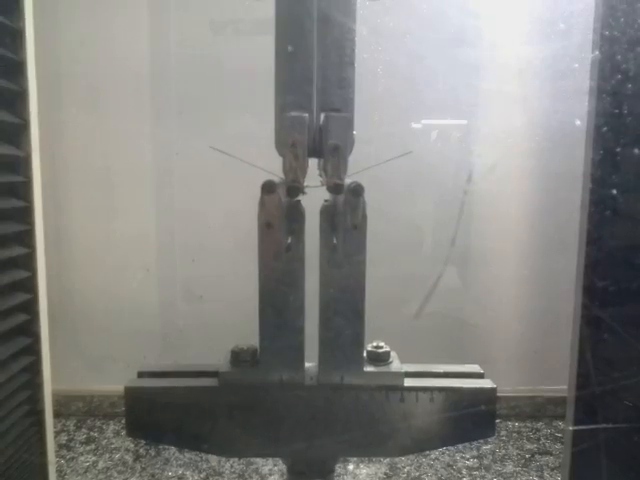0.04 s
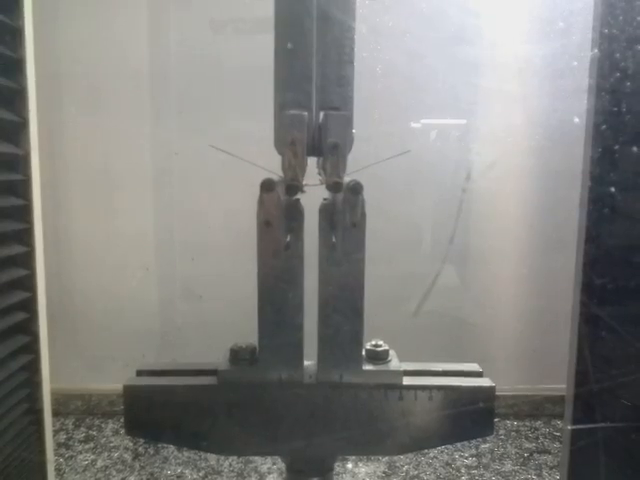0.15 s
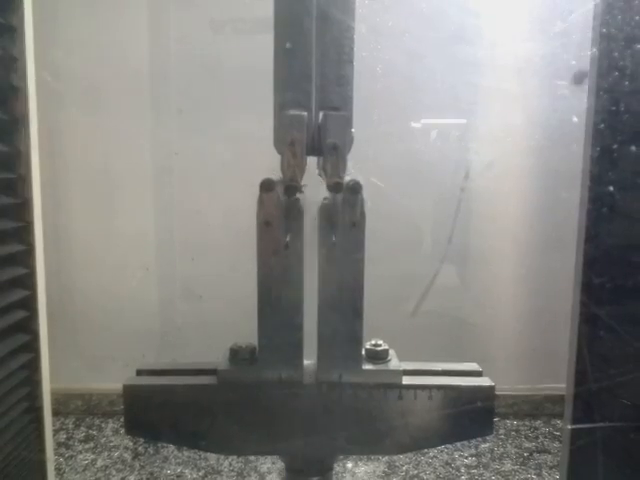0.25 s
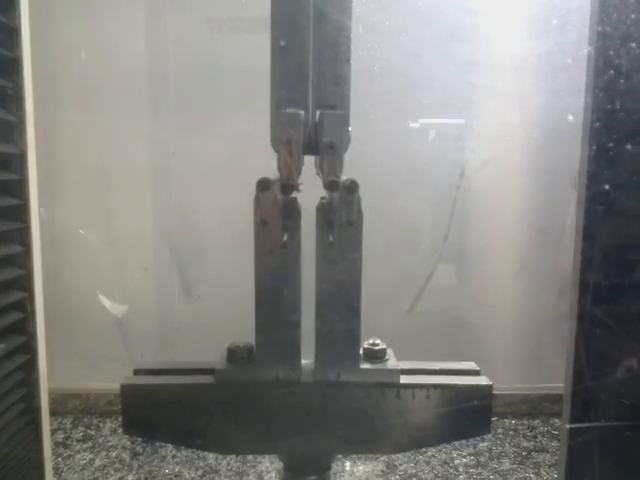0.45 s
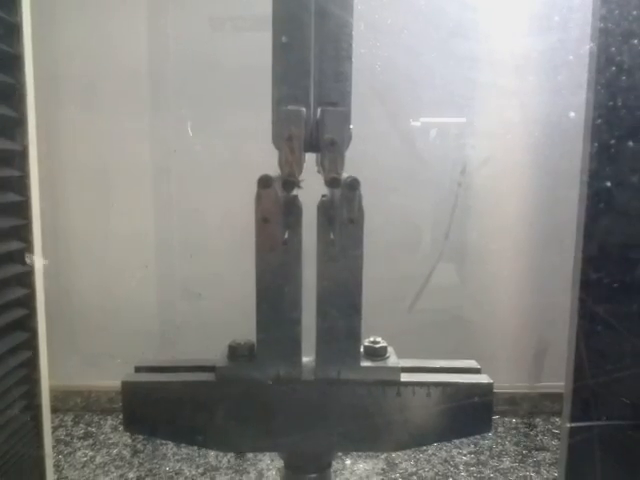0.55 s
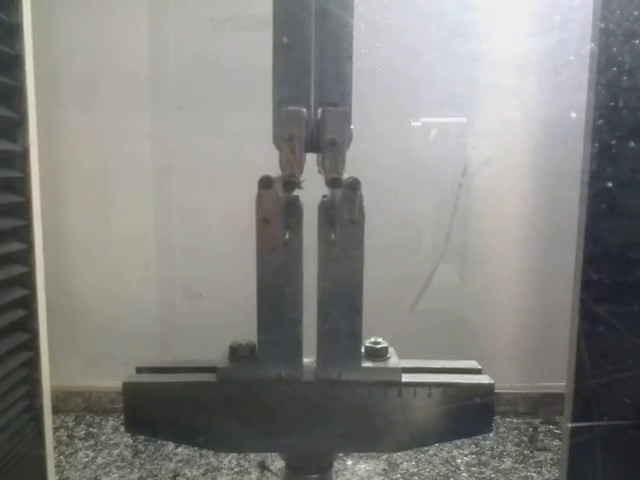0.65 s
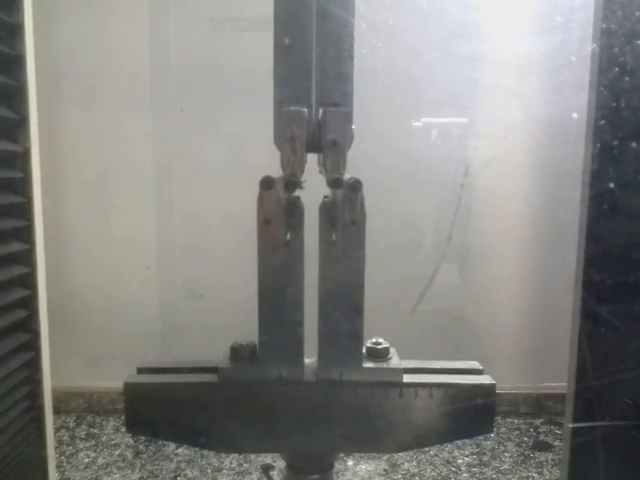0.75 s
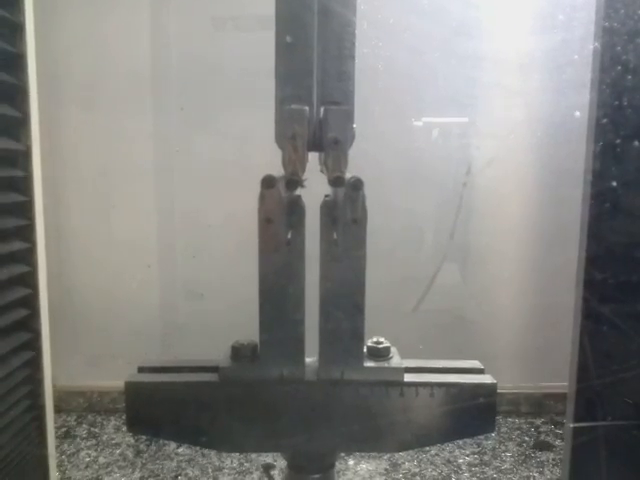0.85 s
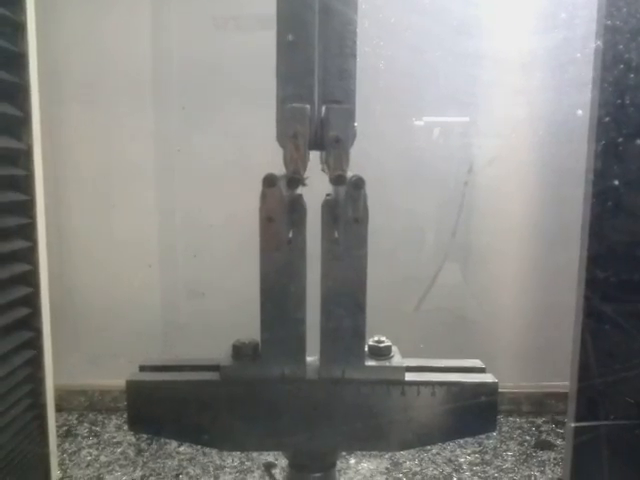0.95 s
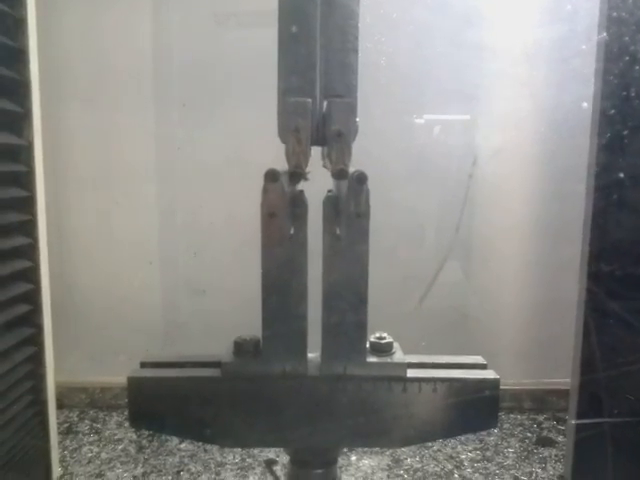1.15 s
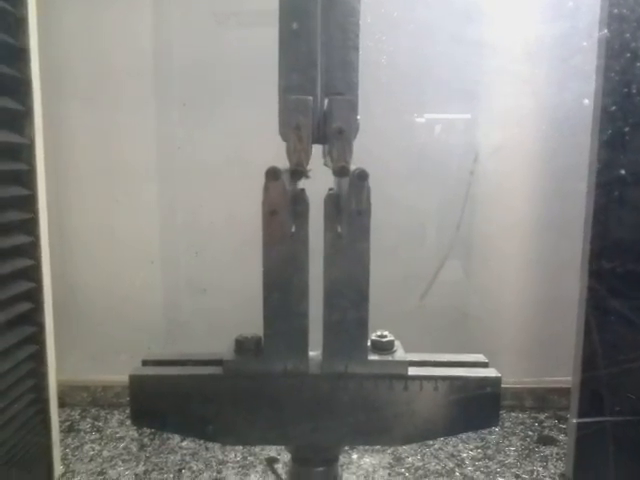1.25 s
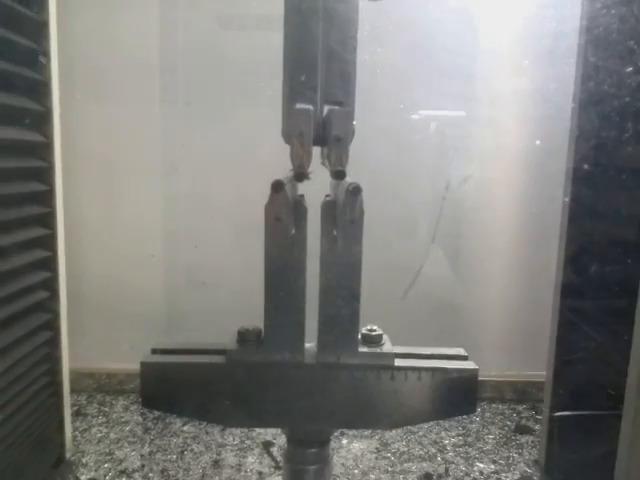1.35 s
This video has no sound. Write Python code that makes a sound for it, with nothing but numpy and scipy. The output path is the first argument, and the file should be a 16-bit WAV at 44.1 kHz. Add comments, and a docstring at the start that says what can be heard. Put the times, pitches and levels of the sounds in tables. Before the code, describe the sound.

A thin glass sheet snaps with one sharp, loud crack in a softly humming testing machine. The steel holder and hard-walled room ring as splinters spray against the guard, then a few pieces faintly tick and tinkle down.

```python
"""In a hard-walled room, a testing machine hums as it bends a thin sheet of glass.
The sheet snaps with one sharp crack that sets the machine's steel holder and the room ringing.
Splinters spray against the guard, then single pieces tick and tinkle down over the hum.
The microphone is stereo only for the high sounds, and it rounds off the loudest peaks."""
import sys
import numpy as np
from scipy import signal
from scipy.fft import rfft, irfft
from scipy.io import wavfile

SR = 44100
rng = np.random.default_rng(int(sys.argv[2]) if len(sys.argv) > 2 else 0)


def store_wav(level_fs):
    """Save 16-bit WAV to argv[1]."""
    pcm = np.round(np.clip(np.atleast_2d(level_fs), -1, 1) * 32767)
    wavfile.write(sys.argv[1], SR, pcm.T.astype(np.int16))


N = 61739
SNAP_S = .2474  # when the glass breaks


def gain(db):
    """Turn decibels into a number to multiply by."""
    return 10 ** (np.asarray(db) / 20)


def frequencies():
    """Every frequency in the sound's spectrum, in Hz."""
    return np.arange(N // 2 + 1) * SR / N


def curve(points):
    """Join (frequency, value) points with lines, giving each octave equal space."""
    hz, values = np.array(points, float).T
    return np.interp(np.log(frequencies() + 1e-9), np.log(hz), values)


def noise(points):
    """Noise shaped by (frequency, level) points, then scaled to strength 1."""
    shaped = irfft(rfft(rng.standard_normal(N)) * gain(curve(points)), N)
    return shaped / np.sqrt(np.mean(shaped ** 2))


def since(start):
    """Seconds since a moment, zero before it."""
    return np.maximum(np.arange(N) / SR - start, 0)


def fade(age, fade_s):
    """Start suddenly, then die away. A fade time is how long a 60 dB drop takes."""
    return (age > 0) * np.exp(-np.log(1000) * age / max(fade_s, 1e-4))


def ring(age, hz, fade_s):
    """One fading note of a struck object."""
    return np.sin(2 * np.pi * hz * age) * fade(age, fade_s)


# The rush of the machine and air vents (frequency [Hz], relative level [dB])
MACHINE_RUSH = [(25, -5.5), (45, -2.5), (75, -10), (110, -7.5), (140, -10.5), (290, -6), (460, -8.5),
                (600, -13.5), (900, -18), (1400, -22.5), (2300, -28.5), (3100, -28.5), (4500, -43),
                (6500, -54.5), (10000, -56), (14000, -58.5)]
# The machine's steady notes (frequency [Hz], level [dB])
MACHINE_NOTES = [(307, -63), (937, -74.5)]

def machine(whine_hz=3028, whine_from_s=.81, swell_s=.083):
    """The machine and vents make a low rush with faint notes; a thin whine joins after the break."""
    notes = sum(gain(db) * np.sin(2 * np.pi * hz * since(0)) for hz, db in MACHINE_NOTES)
    whine = noise([(whine_hz * .98, -80), (whine_hz, 0), (whine_hz * 1.02, -80)])
    swell = np.minimum(since(whine_from_s) / swell_s, 1)
    return gain(-48) * noise(MACHINE_RUSH) + np.sqrt(2) * notes + gain(-67.5) * whine * swell


# The tone of the room's echo (frequency [Hz], relative level [dB])
ECHO_TONE = [(59, -51), (100, -23.5), (175, -7), (275, -8.5), (312, 2), (346, -7), (408, -2.5), (502, -9),
             (604, -3), (670, -7), (1080, -6), (1250, -5.5), (1630, -0.5), (2370, -2), (2730, 0),
             (3430, -2.5), (3970, -1), (4680, -6.5), (6120, -20), (7690, -24), (8700, -21), (10100, -17),
             (14000, -43.5)]
# How long the echo lasts (frequency [Hz], fade time [s])
ECHO_FADES = [(150, 0.93), (400, 1.12), (1000, 1.12), (2000, 1.187), (4000, 1.04), (7000, 1.1), (13000, 1)]

def room_echo(start, build_s=.006):
    """A click bounces off the walls and blurs into noise; each pitch range fades at its own speed."""
    age, spectrum = since(start), rfft(noise(ECHO_TONE))
    echo = 0
    for hz, fade_s in ECHO_FADES:
        band = curve([(other_hz, other_hz == hz) for other_hz, _ in ECHO_FADES])
        echo += irfft(spectrum * band, N) * fade(age, fade_s)
    return echo * (1 - np.exp(-age / build_s))


# Slivers that ring as they land (time [s], frequency [Hz], level [dB], fade time [s])
SLIVER_RINGS = [(1.118, 9140, -55.5, 0.057), (1.19, 5540, -59.5, .09), (1.19, 13700, -61, .08)]
# Pieces landing (time [s], peak level [dB], middle frequency [Hz], width [octaves], fade time [s])
LANDING_TICKS = [(.651, -47, 11000, .3, 0.01), (.879, -45, 7450, 0.57, 0.049),
                 (.936, -43, 4580, 0.17, 0.023), (1.1235, -31, 1470, .6, 0.0032),
                 (1.1668, -39.5, 2800, 0.84, 0.0014), (1.1668, -48.5, 10260, 0.2, 0.02)]

def falling_pieces():
    """Thin slivers ring when they land; bigger pieces make a short tick of noise."""
    out = sum(gain(db) * ring(since(at), hz, fade_s) for at, hz, db, fade_s in SLIVER_RINGS)
    for at, db, hz, octaves, fade_s in LANDING_TICKS:
        band = np.exp(-.5 * (np.log2((frequencies() + 1) / hz) / octaves) ** 2)
        burst = rng.standard_normal(N) * fade(since(at), fade_s)
        tick = irfft(rfft(burst) * band, N)
        out += gain(db) * tick / np.abs(tick).max()
    return out


# Showers of splinters (time [s], spread in time [s], level [dB])
SPLINTER_SHOWERS = [(.322, 0.021, -28.5), (.372, 0.017, -36), (.634, 0.011, -51), (0.801, 0.017, -61.5),
                    (0.982, .01, -63), (1.07, .06, -71.5), (1.19, 0.018, -69.5)]

def splinters(count=60, middle_hz=9680, scatter_octaves=.12, scatter_db=3):
    """Splinters hit the guard in showers, each a cloud of tiny, high, short rings."""
    out, age = np.zeros(N), np.arange(SR // 20) / SR
    for at, spread, db in SPLINTER_SHOWERS:
        cloud = np.zeros(N + len(age))
        for when, pitch, size in rng.standard_normal((count, 3)):
            start = int(np.clip(at + spread * when, SNAP_S, (N - 1) / SR) * SR)
            hz = middle_hz * 2 ** (scatter_octaves * pitch)
            cloud[start:start + len(age)] += gain(scatter_db * size) * ring(age, hz, fade_s=.017)
        shower_samples = np.sqrt(2 * np.pi) * spread * SR
        strength = np.sqrt(np.sum(cloud ** 2) / shower_samples)
        out += gain(db) * cloud[:N] / strength
    return out


def loose_glass(echo_db=-7.5):
    """The splinters and falling pieces echo a little in the room."""
    glass = splinters() + falling_pieces()
    echo = room_echo(0)
    echo /= np.sqrt(np.sum(echo ** 2))
    return glass + gain(echo_db) * signal.fftconvolve(glass, echo)[:N]


# Notes of the steel holder and guard (frequency [Hz], relative level [dB], fade time [s])
STEEL_NOTES = [(316, -8, 0.87), (588, -7.5, 0.85), (1105.5, -1.5, 0.47), (1693, -9, 1.0), (1797, -5, .55),
               (1786, -9, 0.38), (1958, -4, 0.82), (2135, -6, 0.56), (2256, -6, 1), (2530, 2.5, 0.26),
               (2697, -3, 0.96), (3192, 0.5, 0.68), (3725, -9, .55), (4030, -6, 0.62)]

def steel_holder():
    """Freed of its load, the holder thumps and rings; its notes start a tiny bit apart."""
    starts = SNAP_S + rng.uniform(0, .0028, len(STEEL_NOTES))
    steel = sum(gain(db) * ring(since(at), hz, fade_s)
                for (hz, db, fade_s), at in zip(STEEL_NOTES, starts))
    thump = ring(since(SNAP_S), hz=64.3, fade_s=.03)
    return gain(-23) * steel + gain(-40) * thump


# The tone of the crack (frequency [Hz], relative level [dB])
CRACK_TONE = [(40, -33.5), (150, -34.5), (300, -13.5), (650, -15.5), (1080, 1.5), (1300, -5.5), (1800, -1),
              (2200, 0), (2600, -1.5), (3100, -1.5), (3370, -13), (3800, -4.5), (5000, -16), (5750, -9),
              (7500, -27), (10500, -17), (12500, -51), (15000, -32.5)]
# Short notes of the breaking sheet (frequency [Hz], level [dB], fade time [s])
GLASS_NOTES = [(1791, -16.5, .16), (2143, -12, 0.16), (2268, -20.5, 0.2), (3130, -28, 0.088)]

def glass_snap():
    """Cracks race through the sheet in one burst, its halves ring briefly, and the room echoes."""
    halves = sum(gain(db) * ring(since(SNAP_S + rng.uniform(0, .002)), hz, fade_s)
                 for hz, db, fade_s in GLASS_NOTES)
    crack = noise(CRACK_TONE) * fade(since(SNAP_S), fade_s=.2)
    return gain(-9.5) * crack + halves + gain(-12) * room_echo(SNAP_S)


# The microphone's stereo width (frequency [Hz], side level relative to the middle [dB])
STEREO_WIDTH = [(3000, -89.5), (4300, -33.5), (5500, -14.5), (7500, -4), (10000, -6.5), (14000, -8)]

def scene():
    """Everything sits in the middle; only the high sounds differ between the ears."""
    middle = glass_snap() + steel_holder() + loose_glass() + machine()
    side_glass = glass_snap() + loose_glass()  # new random details make the sound wide
    side = irfft(rfft(side_glass) * gain(curve(STEREO_WIDTH)), N)
    return np.array([middle + side, middle - side])


def record(dry, overload=.44, top_hz=14400):
    """The microphone rounds off the loudest peaks and cuts the very highest sounds."""
    rounded = dry / (1 + (overload * dry) ** 4) ** (1 / 4)
    high_cut = signal.ellip(10, .2, 80, top_hz, fs=SR, output="sos")
    return signal.sosfilt(high_cut, rounded)


dry = scene()
out = record(dry)
store_wav(out)
```